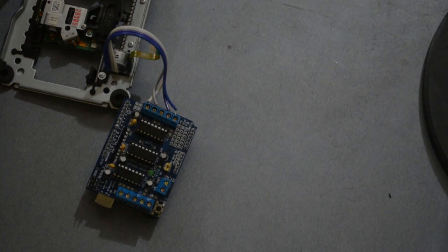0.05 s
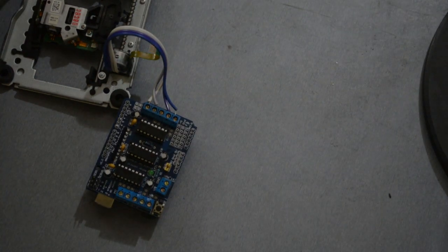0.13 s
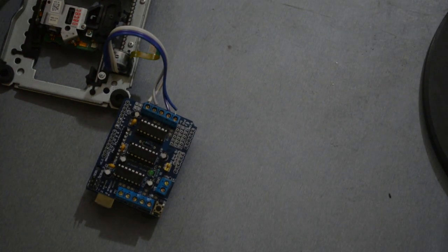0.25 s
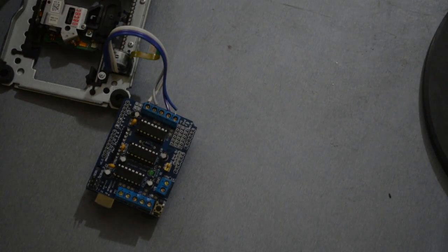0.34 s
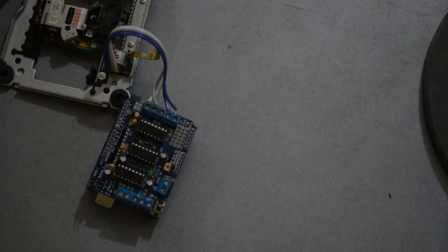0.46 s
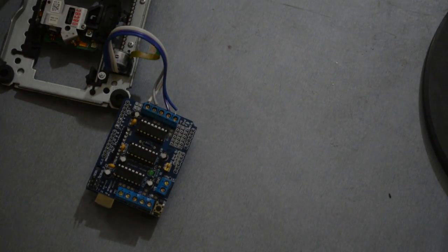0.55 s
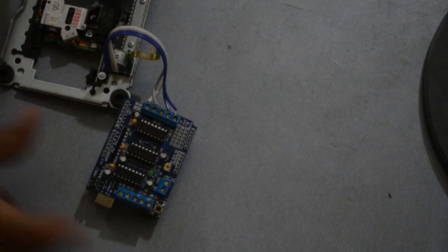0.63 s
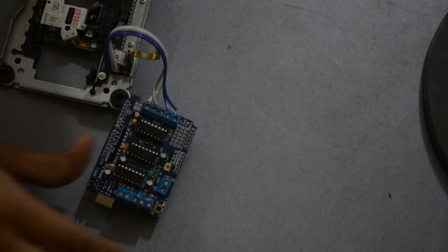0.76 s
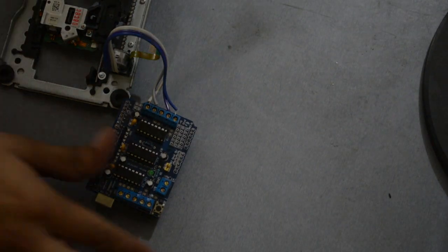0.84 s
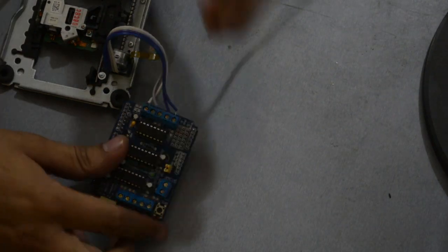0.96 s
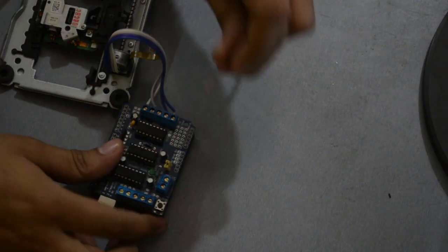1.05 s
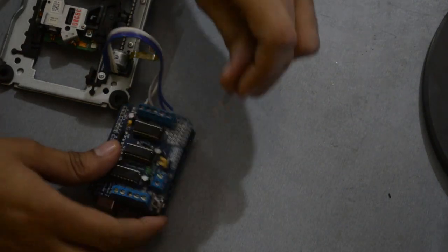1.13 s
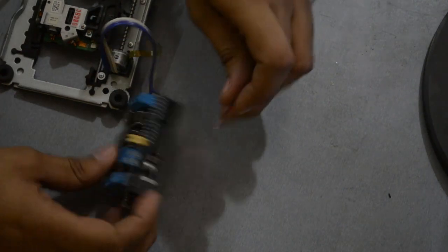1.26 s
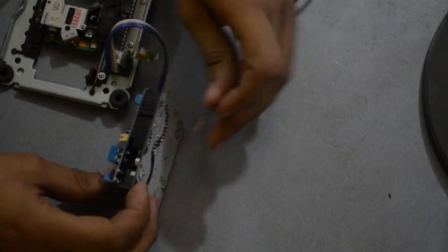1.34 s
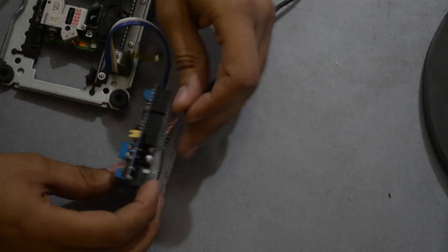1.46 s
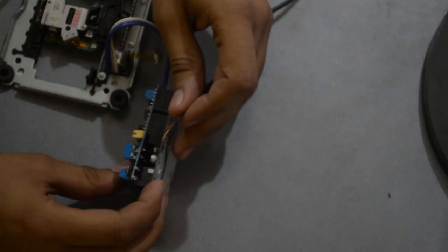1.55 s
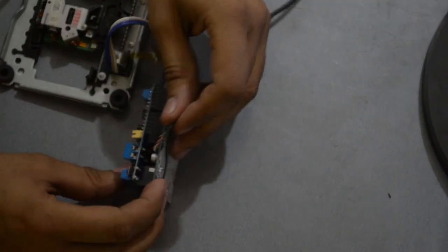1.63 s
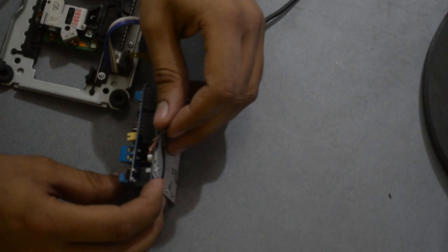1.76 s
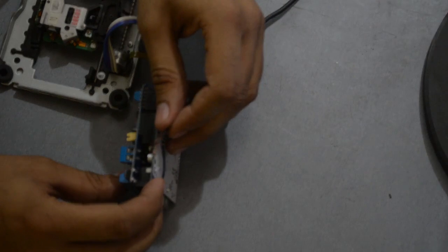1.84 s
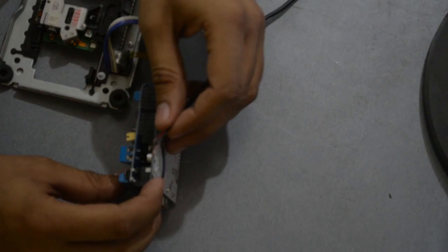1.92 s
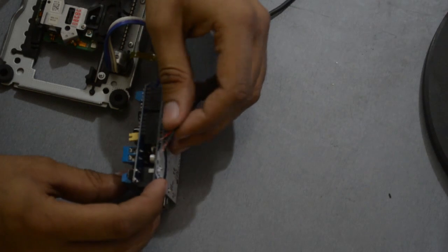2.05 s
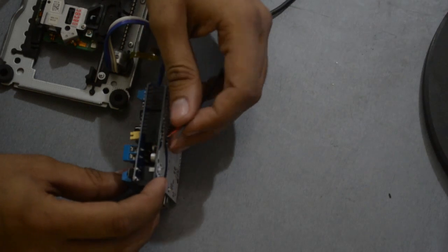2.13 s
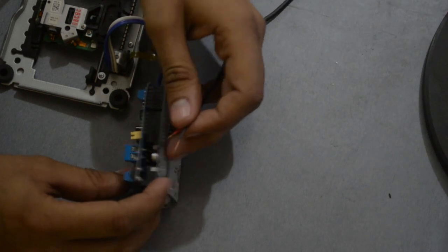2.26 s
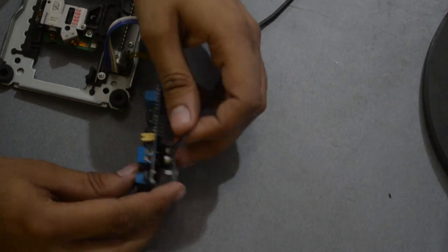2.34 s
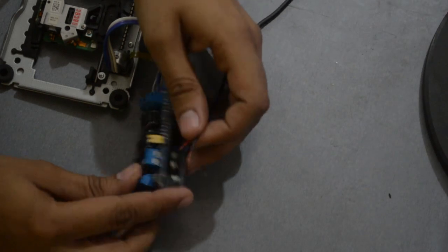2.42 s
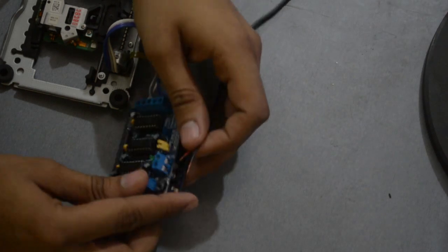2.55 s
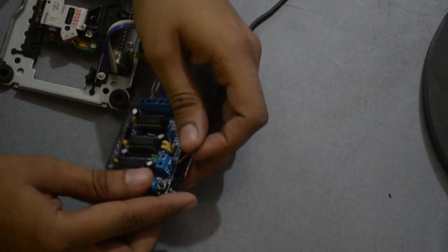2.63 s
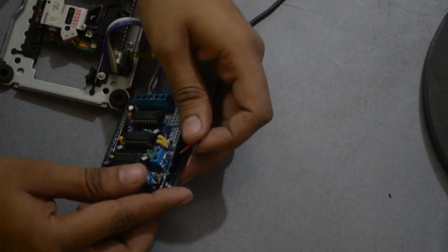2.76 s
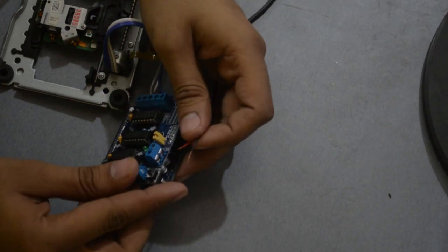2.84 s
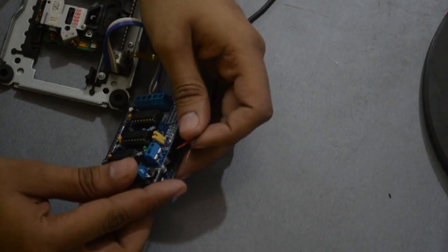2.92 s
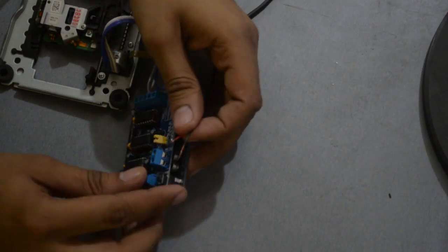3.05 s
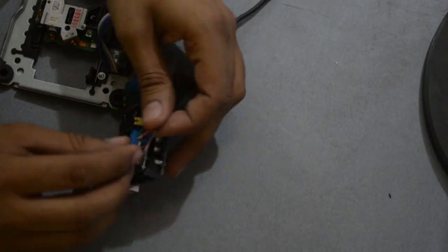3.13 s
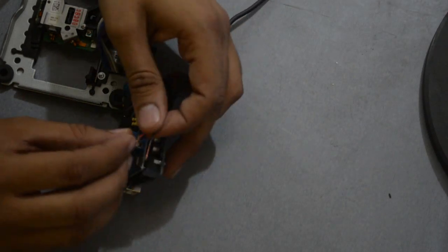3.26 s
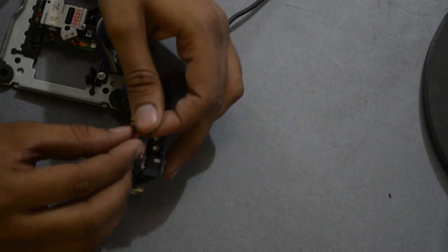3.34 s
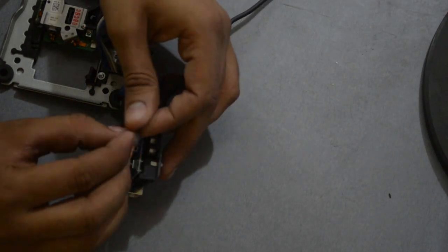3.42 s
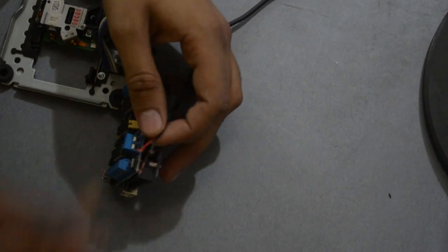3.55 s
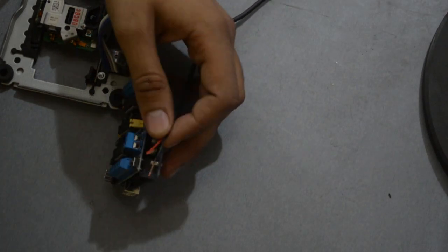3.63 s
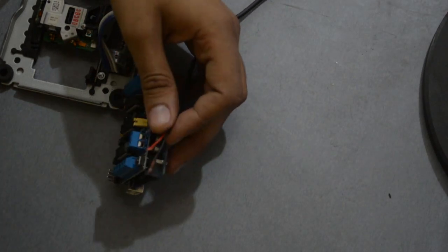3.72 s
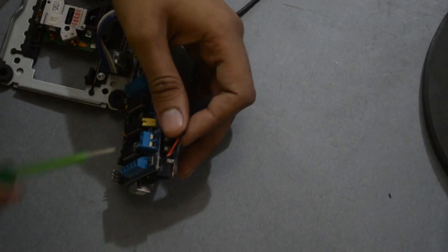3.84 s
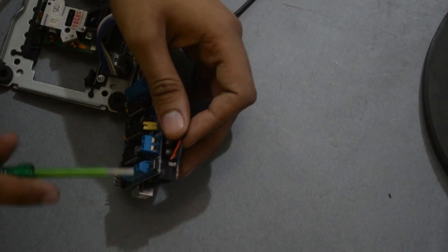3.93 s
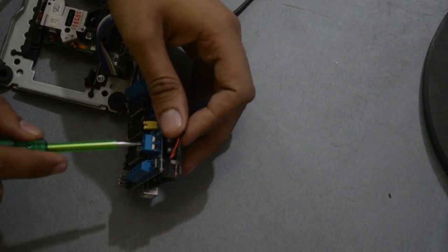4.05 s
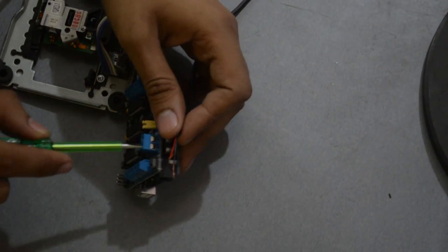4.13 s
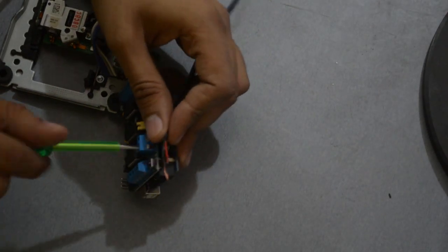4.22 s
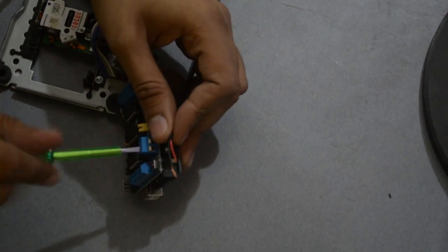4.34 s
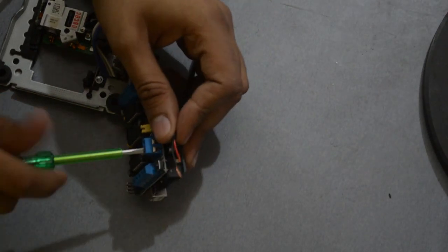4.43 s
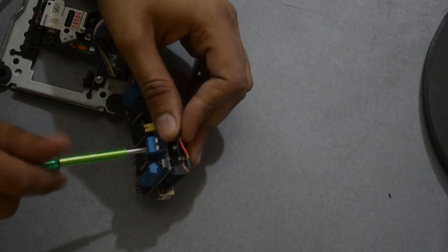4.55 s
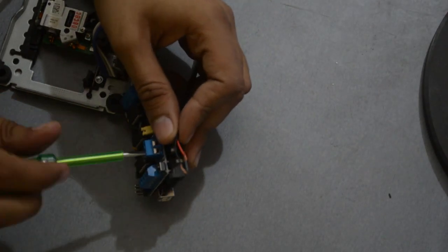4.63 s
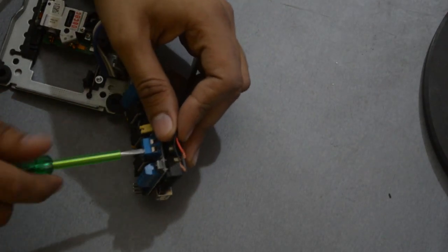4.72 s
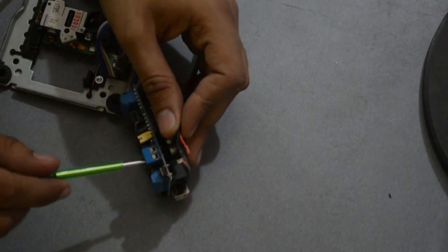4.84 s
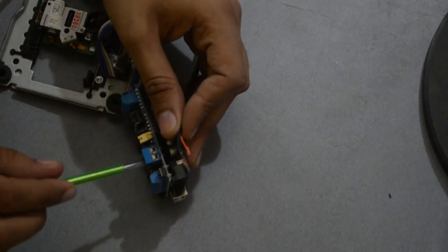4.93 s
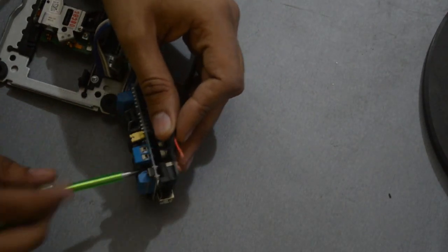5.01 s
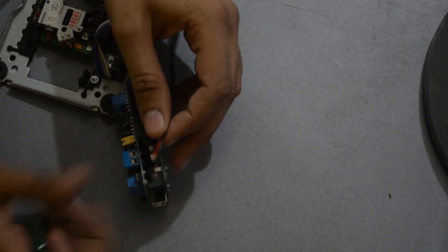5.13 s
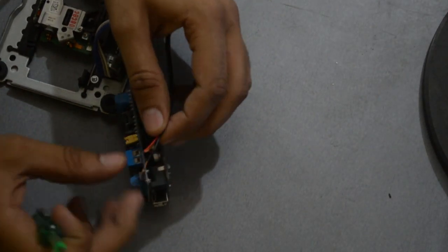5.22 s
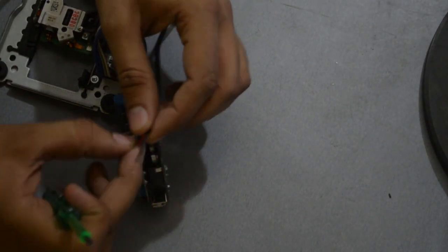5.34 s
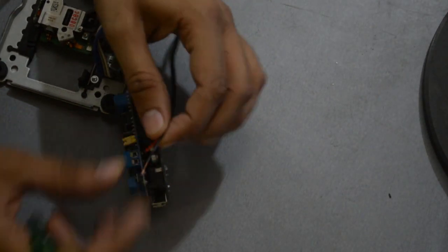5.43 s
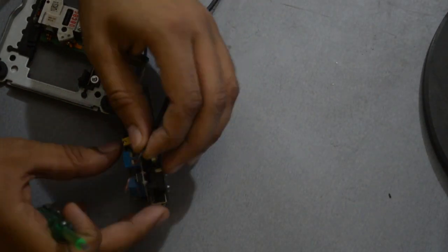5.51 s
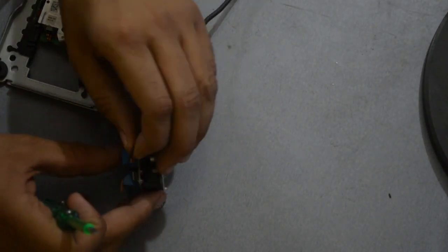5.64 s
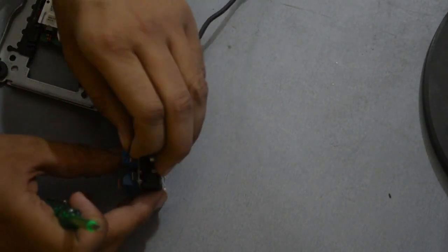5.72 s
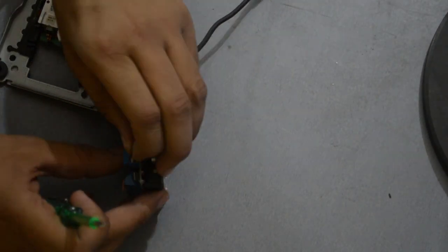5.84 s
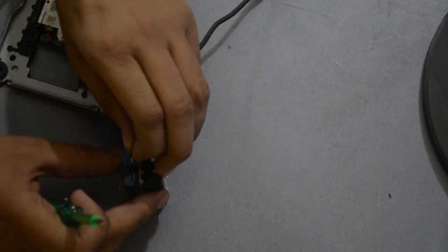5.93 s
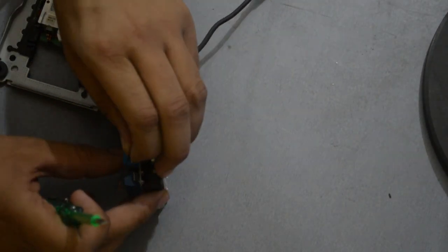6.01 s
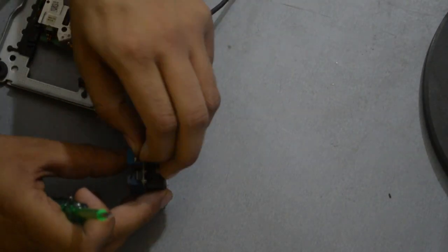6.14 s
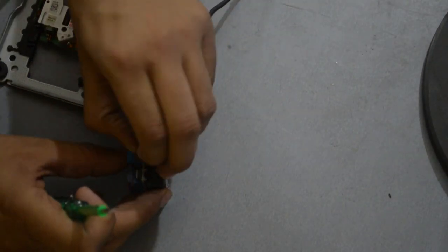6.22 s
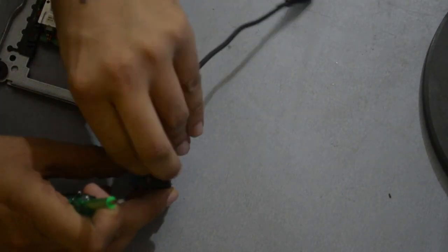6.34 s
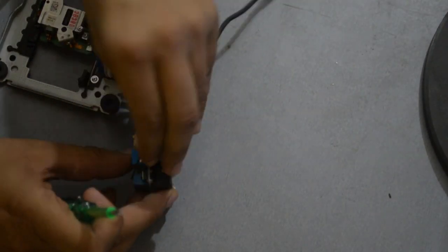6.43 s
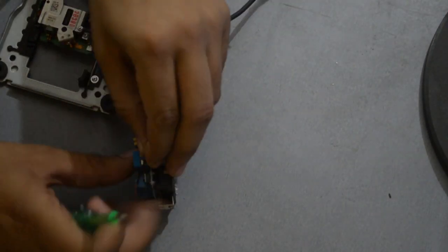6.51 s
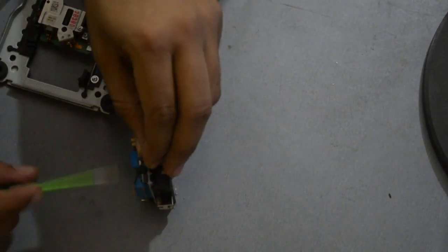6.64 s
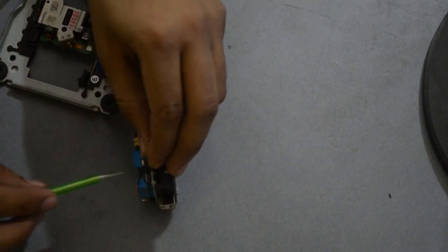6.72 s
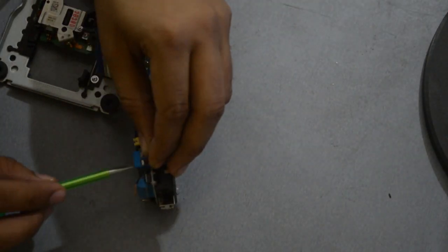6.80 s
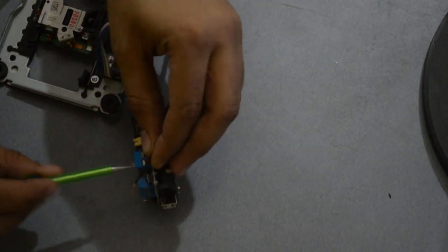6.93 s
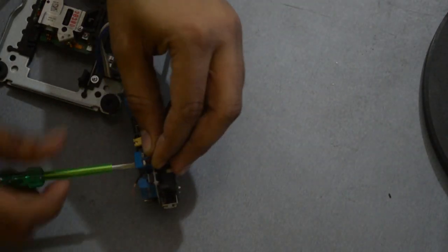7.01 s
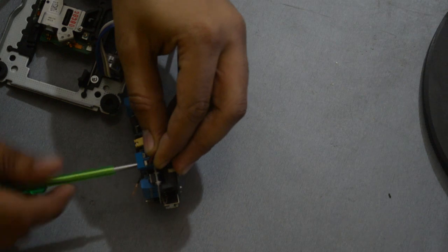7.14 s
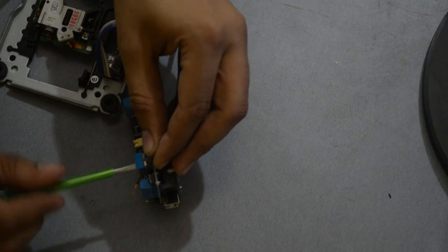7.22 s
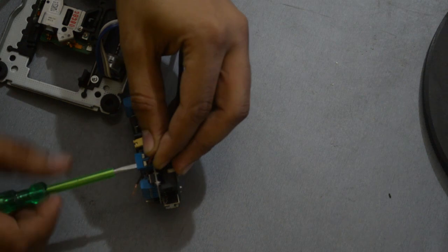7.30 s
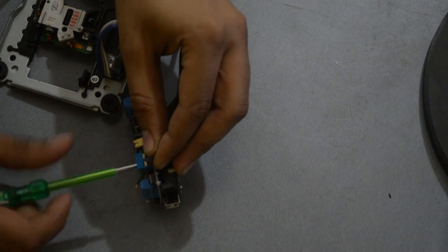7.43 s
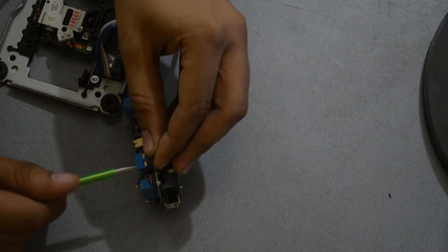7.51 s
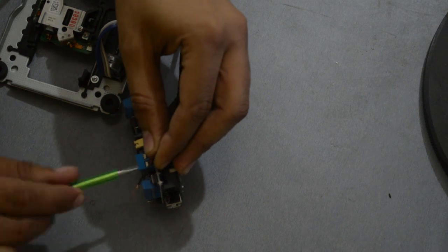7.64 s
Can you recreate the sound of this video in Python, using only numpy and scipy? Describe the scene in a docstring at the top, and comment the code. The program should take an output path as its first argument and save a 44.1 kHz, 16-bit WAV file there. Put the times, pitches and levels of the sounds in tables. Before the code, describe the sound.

0-0.95 s: only steady mains hum and breathy fan noise in a small hard room, heard closely in stereo. 0.96-1.35 s: a circuit board knocks on the workbench in sharp, rattly clacks, strongest near 1.04 and 1.07 and clipping, with lower knocks at 1.3 and a thin cable swish. 1.4-2.05 s: wire strands rub in a terminal with scratchy, bright ticks, slightly to one side. 2.4-2.65 s: softer low knocks and a board scrape. At about 2.8 s, with a faint swish, everything switches to fast motion, over three times higher and shorter; the background becomes a whirring hum. 3.05-5.3 s: tiny screwdriver and finger taps, densest and brightest at 3.7-3.85, with a quick scrape, and distinct clicks near 4.2 and 5.03. Then mostly whirr, an isolated tap at 5.7, and light clicks from 6.45 to 7.56, strongest near 7.04.

```python
"""Mains hum and fan noise fill a small hard room; then a circuit board knocks on a workbench as hands tilt it.
A wire fed into its terminal rubs and ticks, a cable sleeve swishes, the board scrapes, a small screwdriver taps.
Blows ring decaying modes, stick-slip noise drives resonances, and bands of decaying noise make the room.
From FAST_FROM_S on the action runs in fast motion, so every pitch rises and every ring shortens by one factor."""
import sys
import numpy as np
from scipy import signal
from scipy.fft import rfft, irfft, next_fast_len
from scipy.io import wavfile
from scipy.ndimage import uniform_filter1d

SR = 44100
rng = np.random.default_rng(int(sys.argv[2]) if len(sys.argv) > 2 else 0)


def dump_mix(stems):
    """Bounce the given channels to the path in sys.argv[1] as a 16-bit WAV at rate SR."""
    frames = np.atleast_2d(stems).T  # one column per channel
    limited = np.clip(frames, -1, 1)  # hard clip at full scale
    pcm = np.round(limited * 32767).astype(np.int16)
    wavfile.write(sys.argv[1], SR, pcm)


N = 338247

# fast motion resamples every 13 samples to 4
FAST_FROM_S, UP, DOWN = 2.787, 4, 13
SPEED = DOWN / UP
CUT = int(FAST_FROM_S * SR)
LONG = CUT + int((N - CUT) * SPEED) + DOWN  # samples at bench speed
STROKE_RANGE_DB = 24.5  # a stroke starts and ends this far under its loudest moment
RATTLE_TOP_HZ = 4730  # rattle and scraped modes roll off above this, at bench speed


def undb(db):
    """Decibel law: 20 dB is a factor of ten in amplitude."""
    return 10 ** (np.asarray(db) / 20)


def level(x, db):
    """Root-mean-square level: scale a signal to the given dB."""
    return x * undb(db) / np.sqrt(np.mean(x ** 2))


def real_s(s):
    """Time scaling: bench time of a heard time."""
    return np.asarray(s) + (SPEED - 1) * np.maximum(np.asarray(s) - FAST_FROM_S, 0)


def shape(x, points):
    """Spectral filtering: gain in dB interpolated over log frequency between (Hz, dB) points."""
    size = next_fast_len(x.shape[-1])
    hz, db = np.transpose(points)
    bin_hz = np.arange(size // 2 + 1) * SR / size
    gain = undb(np.interp(np.log(bin_hz + 1), np.log(hz), db))
    return irfft(rfft(x, size) * gain, size)[..., :x.shape[-1]]


def ring(x, hz, width_hz):
    """Resonance: a two-pole peak of unit gain at its centre."""
    return signal.lfilter(*signal.iirpeak(hz, hz / width_hz, SR), x)


def ring_twice(x, hz, width_hz):
    """Cascaded resonance: two equal peaks give steeper skirts."""
    return ring(ring(x, hz, width_hz), hz, width_hz)


def grit(scatter_db, per_s):
    """Stick-slip friction: clicks of very uneven size over a little smooth rubbing."""
    happens = rng.random(LONG) < per_s / SR
    size = undb(scatter_db * rng.exponential(size=LONG)) * rng.standard_normal(LONG)
    return level(happens * size, 0) + .5 * rng.standard_normal(LONG)


def add(out, x, s):
    """Superposition: add a sound at its bench time."""
    i = int(real_s(s) * SR)
    out[i:i + len(x)] += x[:LONG - i]


def strokes(rows):
    """Friction envelope: gain over bench time, each stroke swelling and fading steadily in dB."""
    out, t = np.zeros(LONG), np.arange(LONG) / SR
    for s, rise_s, fall_s, db in rows:
        start, top, end = real_s([s - rise_s, s, s + fall_s])
        span = slice(int(start * SR), int(end * SR))
        edge_db = db - STROKE_RANGE_DB
        out[span] += undb(np.interp(t[span], [start, top, end], [edge_db, db, edge_db]))
    return uniform_filter1d(out, size=200)


def stereo(mid, side, width):
    """Interchannel coherence: two close ports, nearly alike in the bass, less so in the treble."""
    side = shape(side, width)
    return np.array([mid + side, mid - side])


# spectrum of the moving air, at bench speed, relative level: centre_hz, level_db
AIR = [(18, -40.5), (30, -39), (124, -8), (145, -12), (179, -10), (287, -11), (319, 0), (437, -8),
       (486, -1.5), (632, -4), (1070, -7), (1630, -11), (1910, -14.5), (2230, -15), (16000, -42)]
AIR_DB = -50  # overall level of the air's mid signal
# stereo width of the air: centre_hz, side_minus_mid_db
AIR_WIDTH = [(50, -7), (300, -14), (1000, -8.5), (3000, -2), (8000, -0.5)]
# fan resonances at bench speed: centre_hz, width_hz, level_db
FAN = [(516, 17, -62.5), (703, 22, -65.5), (990, 220, -59)]
# mains harmonics, before the small pan: multiple_of_mains, level_db
HUM = [(1, -69.5), (2, -60), (3, -58.5), (4, -78.5), (7, -65.5), (9, -63.5), (13, -61.5), (17, -72),
       (35, -79), (37, -72), (39, -74.5)]
MAINS_HZ, HUM_PAN_DB = 49.85, 0.15  # at bench speed


def background():
    """Stationary noise and a harmonic series: moving air, fan resonances and mains hum."""
    noise = rng.standard_normal((3, LONG))
    air = shape(noise[:2], AIR)
    air = stereo(*(air * undb(AIR_DB) / air[0].std()), AIR_WIDTH)
    fan = sum(level(ring(noise[2], hz, width), db) for hz, width, db in FAN)
    # the hum repeats every mains cycle: one cycle, read over and over
    turn = np.arange(1024) / 1024
    cycle = sum(np.sqrt(2) * undb(db) * np.sin(k * (2 * np.pi * turn + k)) for k, db in HUM)
    hum = np.interp(MAINS_HZ * np.arange(LONG) / SR, turn, cycle, period=1)
    return air + fan + hum * undb([[HUM_PAN_DB], [-HUM_PAN_DB]])


# the bench top thuds under the board, before per-blow scatter: pitch_hz, level_db, t60_s
BENCH = (73, -30, 0.12)
# board modes at bench speed, before per-blow scatter: pitch_hz, level_db, t60_s
BOARD = [(323.4, 5, 0.15), (413.8, -5, 0.18), (633, 0.5, 0.067), (962, 2.5, 0.058), (1214.6, 5, 0.072),
         (1302, 4, 0.052), (1640, -19, 0.014), (1930, -1, 0.0085), (2160, -3.5, 0.024), (2456, -5.5, 0.041),
         (2840, -4, 0.037), (3060, -8.5, 0.073), (4250, -31, 0.046), (4930, -9, 0.12)]


def blows(table, speed, thump_db, bright_db, crack_hz, crack_s, focus_db, rattle_db, rattle_s,
          spread, lift, first_touch):
    """Modal excitation: a blow rings the modes nearest its favoured pitch most, with a crack and a rattle."""
    out, t = np.zeros(LONG), np.arange(SR // 5) / SR
    hz, db, t60 = np.transpose([BENCH] + BOARD)[:, :, None]
    for s, peak_db, thump, bright, near_hz in table:
        luck, noise = rng.standard_normal((2, len(hz), 1)), rng.standard_normal((3, len(t)))
        bench_hz = near_hz / speed
        decay = 1000 ** (-t / t60)
        free = np.sin(2 * np.pi * hz * (1 + 0.013 * luck[1]) * t) * decay * undb(db + 2.0 * luck[0])
        # modes lose focus_db for each octave away from the favoured pitch
        focus = undb(-focus_db * np.abs(np.log2(hz / bench_hz)))
        body = (free * focus)[3:].sum(axis=0)
        # the contact chatters for a moment instead of touching once
        chatter = noise[2, :400] * np.exp(-t[:400] / 0.0029)
        chatter[0] += first_touch
        # a contact of finite length cannot push far above its favoured pitch
        push = np.hanning(int(.3 * SR / bench_hz) + 3)
        body = np.convolve(body, np.convolve(chatter, push))[:len(t)]
        # loose parts on the board clatter on after the contact, near the favoured pitch
        rattle = noise[0] * (np.exp(-t / rattle_s) + 0.16 * np.exp(-t / 0.018))
        for _ in range(3):
            rattle = ring(rattle, lift * bench_hz, spread * bench_hz)
        rattle = signal.sosfilt(signal.butter(4, RATTLE_TOP_HZ, fs=SR, output="sos"), rattle)
        body = body / np.abs(body).max() + undb(rattle_db) * rattle / np.abs(rattle).max()
        crack = noise[1] * (np.exp(-t / crack_s) + .04 * np.exp(-t / 0.017))
        crack = ring_twice(crack, crack_hz, 1.2 * crack_hz)
        crack = crack / np.abs(crack).max() * undb(bright + bright_db)
        # the lowest modes flex the whole board and build up over a cycle
        low = free[:3].sum(axis=0) * undb(thump + thump_db) * (1 - np.exp(-t / 0.014))
        add(out, undb(peak_db) * (body + low + crack), s)
    return out


# board edge on the bench; thump and brightness are relative to the blow and trimmed below,
# the favoured pitch is divided by speed: start_s, level_db, thump_db, brightness_db, pitch_hz
KNOCKS = [(0.959, -11, -21.5, -5.5, 1400), (0.969, -16.5, -20, -4, 2800), (1.037, 3, -20.5, -7, 1900),
          (1.072, 1, -17, -5, 2330), (1.158, -14.5, -38, -12, 1300), (1.303, -5.5, -9.5, -20, 1060),
          (1.352, -3, -22, -40, 1140), (1.979, -31, -20, -13.5, 1200), (2.402, -19, -12, -22, 707),
          (2.413, -36, -26, -25, 900), (2.499, -23, -10.5, -27, 1220), (2.558, -36, -2, -24, 1240)]


def knocks():
    """Impact of a plate edge: a narrow focus on few modes and a short rattle."""
    return blows(KNOCKS, 0.93, thump_db=1.0, bright_db=-4.5, crack_hz=3800, crack_s=0.003, focus_db=19.0,
                 rattle_db=-2.4, rattle_s=0.0043, spread=2.5, lift=1.036, first_touch=2.7)


# echo bands at bench speed, levels before the tilt with frequency: centre_hz, t60_s, level_db
ROOM = [(304, 0.15, -38.5), (652, 0.59, -36.5), (1300, 0.13, -44), (3060, 0.17, -74.5), (6100, 0.85, -37.5),
        (9640, 0.15, -28)]
# stereo width of the echo: centre_hz, side_minus_mid_db
ROOM_WIDTH = [(300, -31), (1000, -29.5), (3000, -12.5), (8000, -1.5)]
# board and hands keep moving, so the echo pattern changes this often among a few
ROOM_VIEWS, ROOM_HOLD_S = 4, .03  # hold in bench time


def room(x):
    """Reverberation: broad bands of decaying noise that set in once the first wall echo is back."""
    t, out = np.arange(int(.6 * SR)) / SR, 0
    view = np.arange(LONG) // int(ROOM_HOLD_S * SR) % ROOM_VIEWS
    for k in range(ROOM_VIEWS):
        noise, tail = rng.standard_normal((2, len(t))), 0
        for hz, t60, db in ROOM:
            band = ring(noise, hz, 2.08 * hz) * np.sqrt(1000 / hz)
            tail = tail + undb(db) * band * 1000 ** (-t / t60)
        tail = tail * np.clip((t - .004) / 0.013, 0, 1)
        share = uniform_filter1d(1. * (view == k), size=100)
        echo = signal.oaconvolve((x * share)[None], stereo(*tail, ROOM_WIDTH), axes=1)
        out = out + echo[:, :LONG]
    return out


# wire strands catching, levels before the resonances: start_s, level_db
TICKS = [(1.186, -16), (1.44, -13), (1.477, -18), (1.545, -20), (1.584, -21), (1.599, -23.5),
         (1.655, -14.5), (1.683, -26), (1.723, -22.5), (1.731, -17.5), (1.892, -22.5), (1.939, -16.5),
         (1.981, -18), (1.991, -25), (2.041, -30)]
# strokes of the wire in the terminal, levels before drive gain: loudest_s, rise_s, fall_s, level_db
WIRE_RUB = [(1.474, 0.11, 0.018, -34.5), (1.6, 0.23, 0.0043, -37), (1.652, 0.0038, 0.16, -35),
            (1.888, 0.28, 0.016, -41.5), (1.94, .005, 0.074, -31.5), (2.0, .06, .045, -39.5)]
# strand resonances at bench speed, widths before a slight narrowing: pitch_hz, width_hz, level_db
WIRE = [(2690, 1840, -11.5), (4240, 590, -5.5), (4700, 380, -2.5), (5800, 210, -15), (7140, 160, -16),
        (10200, 350, -39), (10500, 350, -37)]


def wire(jolts):
    """Source and resonator: rubbing, catches and board jolts ring the same strands; catches also snap broadly."""
    rub = grit(2.4, 2700) * strokes(WIRE_RUB) * undb(10)
    catches = np.zeros(LONG)
    for s, peak_db in TICKS:
        add(catches, undb(peak_db) * rng.standard_normal(88) * np.exp(-np.arange(88) / 25), s)
    push = rub + undb(8.5) * catches + undb(-1.0) * jolts
    snap = undb(-5.5) * ring_twice(catches, 3000, 3500)
    return snap + sum(undb(db) * ring_twice(push, hz, 0.97 * width) for hz, width, db in WIRE)


# cable sleeve brushing past, pitches at bench speed:
# loudest_s, rise_s, fall_s, level_db, centre_hz, width_hz
CABLE_SWISH = [(1.292, 0.057, 0.087, -42.5, 8640, 3060), (1.358, 0.012, 0.069, -34.5, 8600, 5200),
               (2.77, 0.062, 0.065, -52, 4050, 1300), (2.795, 0.01, .05, -50, 3800, 1900),
               (2.835, .02, .065, -48, 3800, 1930)]


def swish():
    """Band-limited friction noise: the cable sleeve brushes past, thin and airy."""
    rub, out = grit(1.5, 2800), 0
    for *stroke, hz, width in CABLE_SWISH:
        band = ring(ring_twice(rub, hz, width), hz, width)
        out = out + level(band, 0) * strokes([stroke])
    return out


# drags of the board edge, rasp relative to the drag: loudest_s, rise_s, fall_s, level_db, rasp_db
BOARD_SCRAPE = [(2.4, 0.035, 0.055, -41.5, -10), (2.466, 0.045, 0.14, -32.5, -19),
                (2.577, 0.03, 0.074, -39, -22), (3.192, 0.006, .08, -51, -16),
                (3.77, 0.058, .1, -40.5, -13), (3.823, 0.0038, .005, -43, -7),
                (4.445, 0.035, 0.033, -48, -20), (5.21, 0.046, .3, -62, -12),
                (6.431, 0.038, 0.018, -46, -20)]


def scrape():
    """Friction-driven modes: slips of the dragging board edge ring its modes, with a rasp above."""
    slips = grit(1.2, 3000)
    body = sum(undb(db) * ring(slips, hz, 9.0 / t60) for hz, db, t60 in BOARD)
    body = signal.sosfilt(signal.butter(2, RATTLE_TOP_HZ, fs=SR, output="sos"), body)
    rasp = ring_twice(grit(1.2, 5000), 4000, 6000)
    body_gain = strokes(row[:4] for row in BOARD_SCRAPE)
    rasp_gain = strokes((*when, db + rasp_db) for *when, db, rasp_db in BOARD_SCRAPE)
    return level(body, -2.5) * body_gain + level(rasp, 0) * rasp_gain


# blade and fingers on the terminal, pitches as heard in fast motion; thump and brightness are
# relative to the blow and trimmed below: start_s, level_db, thump_db, brightness_db, pitch_hz
TAPS = [(3.055, -37.5, -5.5, -21, 3880), (3.105, -21.5, -9, -4, 3730), (3.168, -33, -3, -3, 3420),
        (3.196, -32.5, -26, -21, 2840), (3.227, -41.5, -3, -23, 2110), (3.477, -32.5, -14.5, -5, 2320),
        (3.608, -24.5, -14, -38, 3600), (3.709, -25.5, -27, -4, 4840), (3.739, -20.5, -40, 12.5, 3520),
        (3.764, -25, -17, -18, 4430), (3.787, -26, -17, -10, 4730), (3.825, -17.5, -22, 0.5, 4960),
        (3.842, -19.5, -22, 0, 2030), (3.849, -15, -40, -22, 4240), (4.143, -35, -6.5, 1, 3130),
        (4.181, -14.5, -16, -2, 3640), (4.21, -28, -29, -18, 3930), (4.293, -41.5, -2, -6, 1680),
        (4.333, -25.5, -12.5, -27.5, 4000), (4.411, -36, -11, -25, 3970), (4.431, -30.5, -13, -23, 3100),
        (4.455, -30.5, -13, -25, 3820), (4.525, -22, -16, -30, 4100), (4.655, -29.5, -14.5, -32, 3570),
        (4.82, -32, -3.5, -32, 3500), (4.834, -19.5, -20, -27, 2690), (4.9, -25, -19, -8, 2660),
        (5.015, -30, -15, -22, 1810), (5.032, -20, -7.5, -8, 4000), (5.034, -16, -37, 0, 3460),
        (5.202, -37, -7, -27, 2100), (5.243, -32.5, -10, -27, 2770), (5.314, -37, -10.5, -17, 3040),
        (5.676, -24.5, -14, -35, 2800), (6.452, -26.5, -17, 0.5, 5150), (6.601, -31.5, -16, 1, 4760),
        (6.734, -28.5, -25, -21, 3500), (6.942, -29.5, -14, -6, 3940), (7.041, -17, -20, -4, 4860),
        (7.069, -30, -34, -14, 2700), (7.124, -45, -2, -15, 1630), (7.198, -28, -23, -28, 3800),
        (7.243, -34.5, -20, -28, 2500), (7.434, -42.5, -8, -3, 1650), (7.529, -20.5, -23, -23, 3600),
        (7.564, -33.5, -18, -36, 3870)]


def taps():
    """Impact of a small tool: a loose focus over many modes and a longer, narrower rattle."""
    return blows(TAPS, SPEED, thump_db=6.5, bright_db=1.0, crack_hz=2500, crack_s=0.0026, focus_db=3.5,
                 rattle_db=1.0, rattle_s=0.011, spread=1.0, lift=0.97, first_touch=8.0)


# response of the microphone capsule, which loses the top: centre_hz, level_db
MIC = [(7000, -1), (10500, 3), (12000, 2), (16000, -5)]


def scene():
    """Linear superposition at bench speed, then time compression of the later part."""
    board = knocks() + taps() + scrape()
    # little radiates below the lowest board mode
    board = signal.sosfilt(signal.butter(4, 135, "high", fs=SR, output="sos"), board)
    strands = wire(board) + swish()
    direct = board + strands * undb([[-1.8], [1.8]])  # the strands lie to one side
    bench = direct + room(board + undb(-7) * strands) + background()
    bench = shape(bench, MIC)
    fast = signal.resample_poly(bench[:, CUT:], UP, DOWN, axis=1)
    return np.hstack([bench[:, :CUT], fast])[:, :N]


TOP_HZ = 15750


def record(dry):
    """Overload and band limiting: the loudest knocks clip; the top is cut."""
    low_pass = signal.ellip(10, .2, 60, TOP_HZ, fs=SR, output="sos")
    return signal.sosfilt(low_pass, np.clip(dry, -1, 1))


dry = scene()
out = record(dry)
dump_mix(out)
```